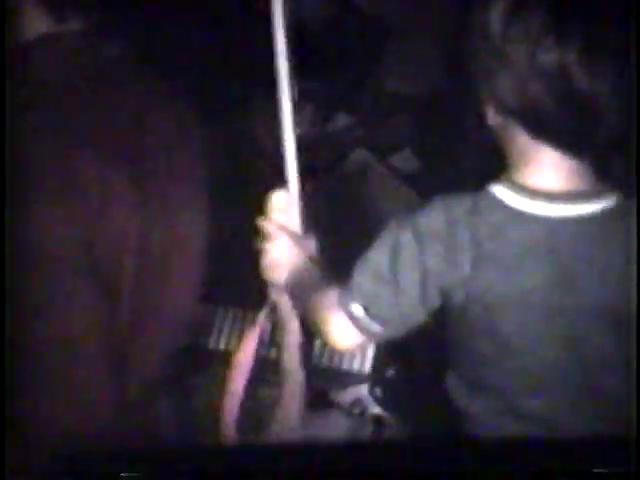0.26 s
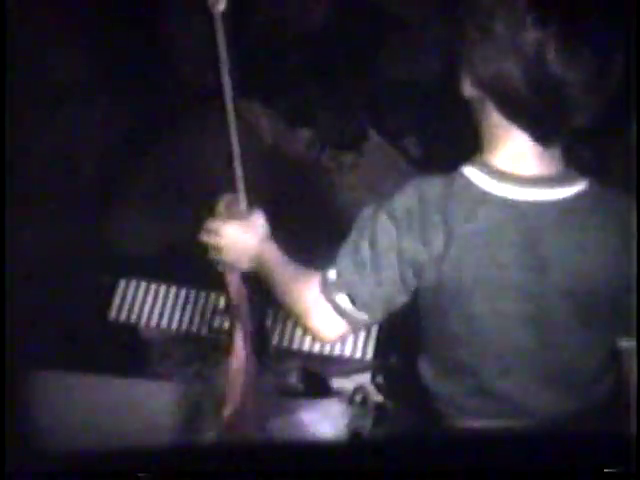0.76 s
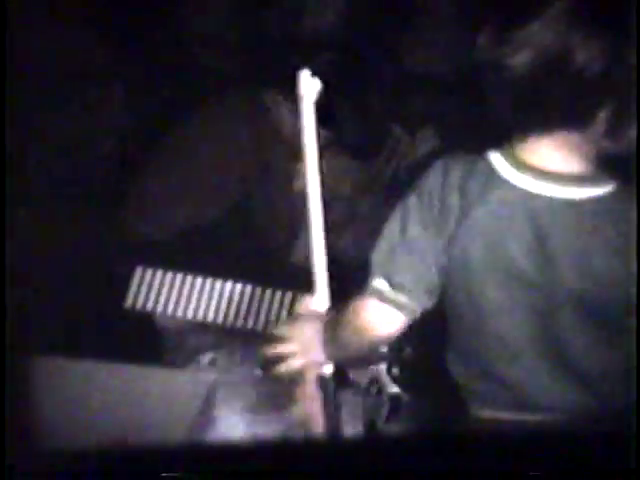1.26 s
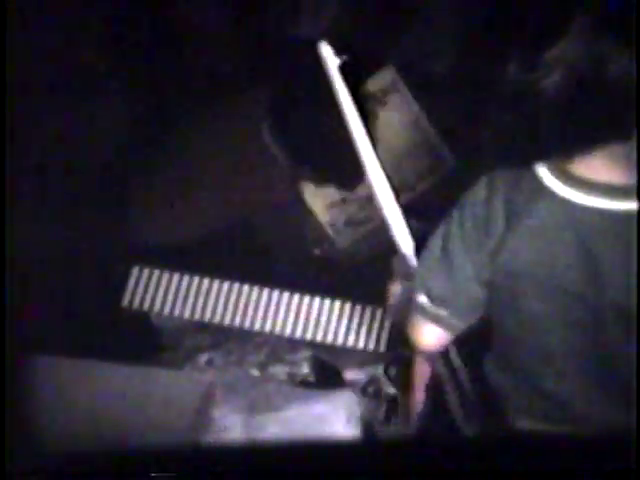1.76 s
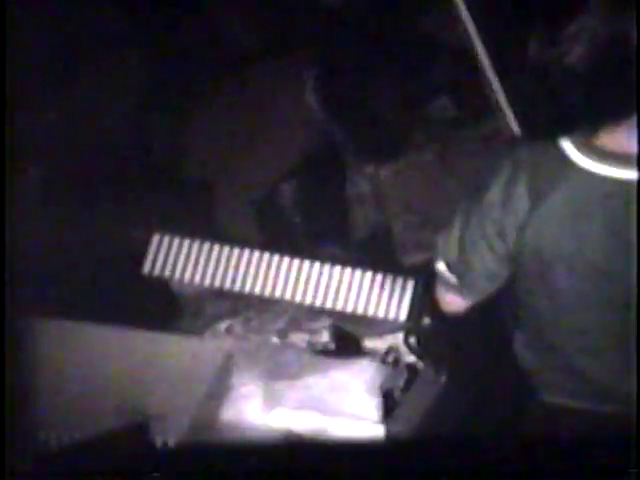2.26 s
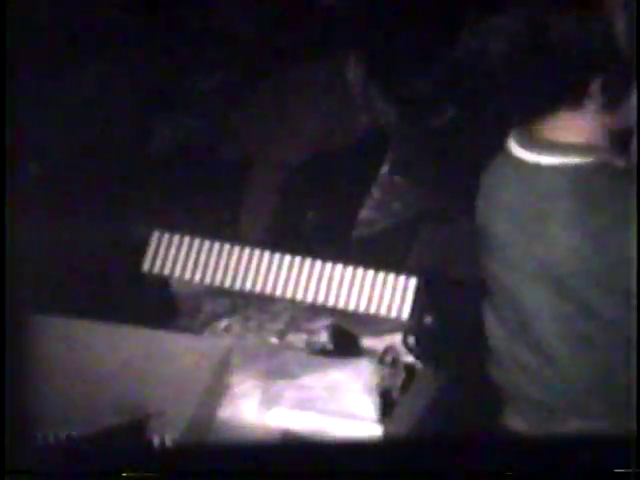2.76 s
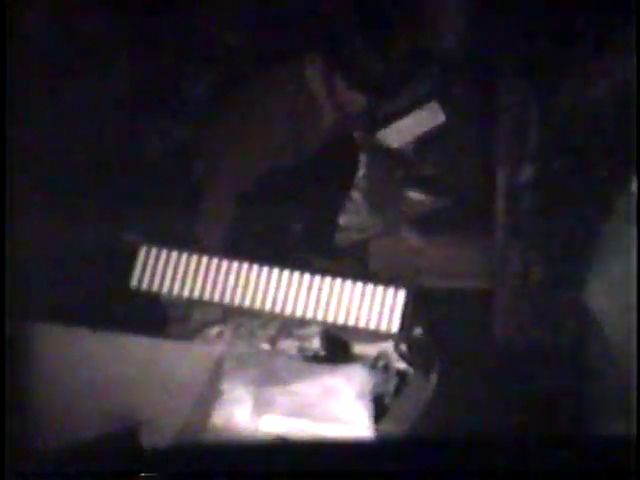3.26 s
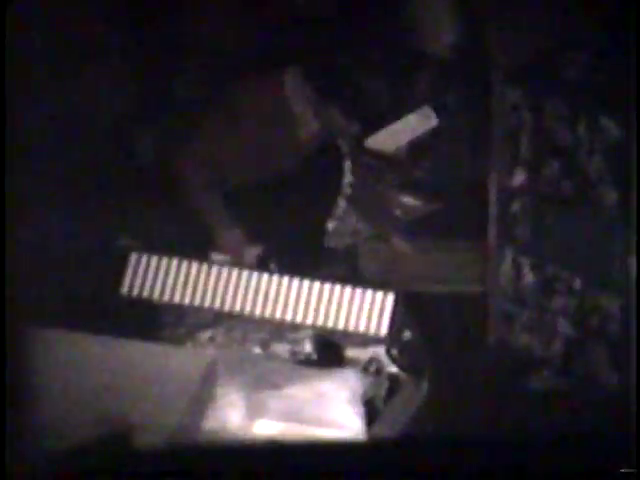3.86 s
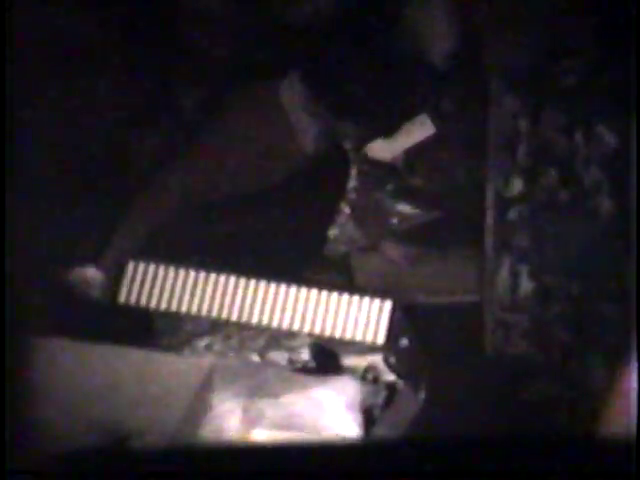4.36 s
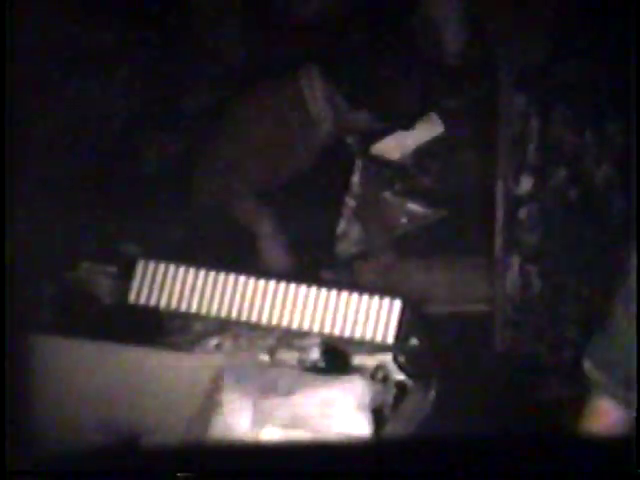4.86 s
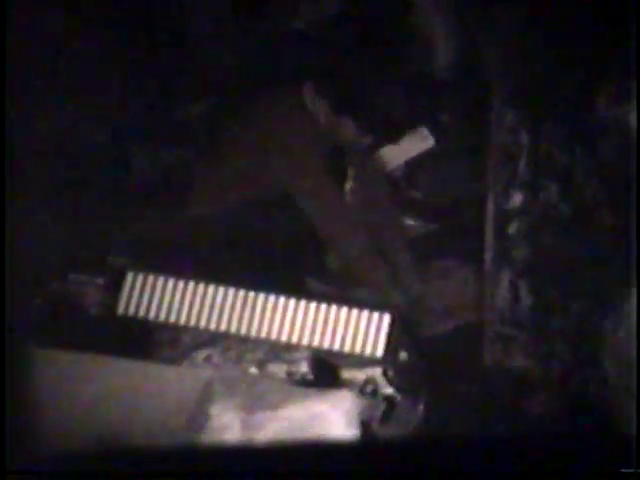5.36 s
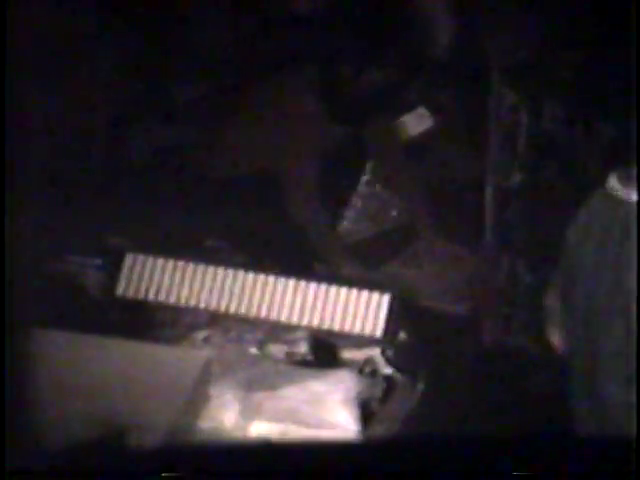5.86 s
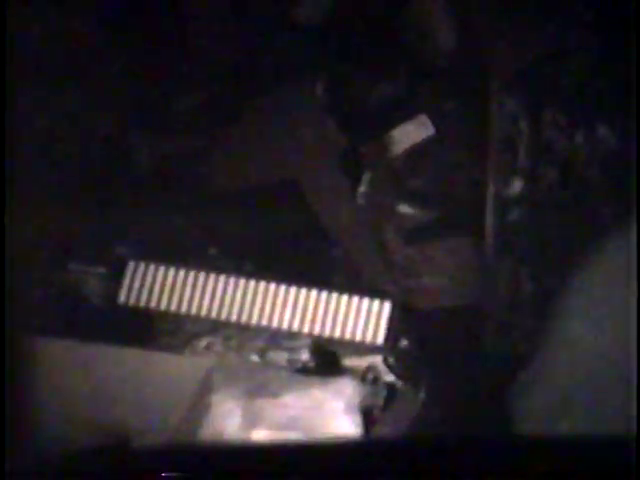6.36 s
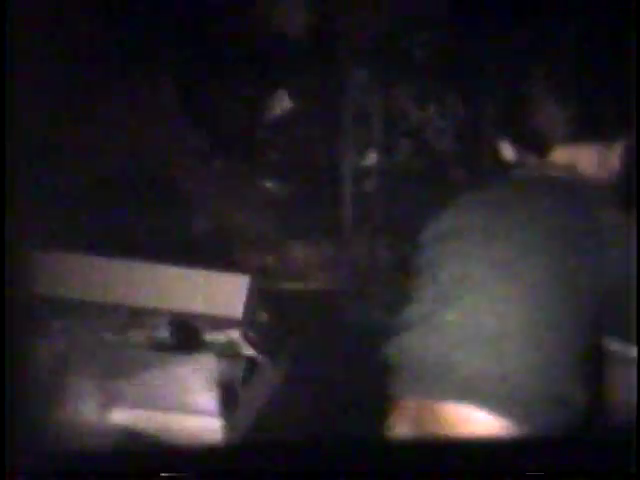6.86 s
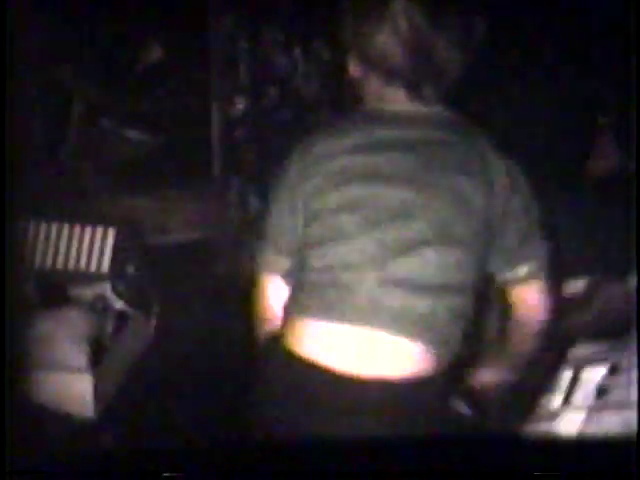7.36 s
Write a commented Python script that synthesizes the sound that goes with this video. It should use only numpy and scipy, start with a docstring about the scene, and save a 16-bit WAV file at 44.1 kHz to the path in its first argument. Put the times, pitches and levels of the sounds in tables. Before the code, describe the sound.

A film projector whirs close to the microphone from start to end at an even speed. Its motor hums, buzzes and flutters quickly, mixed with bearing hiss and a fast mechanical chatter of the claw. The shutter shaft drones along. A faint bright rub swells and lets go once each reel turn. Soft fan noise and dull low bumps sit underneath; one thin tick comes past the middle. Nobody speaks.

```python
"""In a quiet room, a small-gauge film projector runs steadily close by.
Its induction motor buzzes and throbs as the rotor slips behind the mains: steady tones, noise knocks and hiss.
The rotor bars add a beating whine, made of noise ringing in a case resonance.
The claw clatters at every frame and the shutter shaft drones; the take-up reel rubs once a turn.
Fan noise, mains hum and soft low bumps lie underneath, and one thin tick is heard."""
import sys
import numpy as np
from scipy import signal
from scipy.fft import rfft, irfft, next_fast_len
from scipy.io import wavfile

SR = 44100
rng = np.random.default_rng(int(sys.argv[2]) if len(sys.argv) > 2 else 0)


def pcm_store(signal):
    """Save signal as 16-bit PCM."""
    levels = np.round(np.clip(np.atleast_2d(signal), -1, 1) * 32767)
    wavfile.write(sys.argv[1], SR, levels.astype(np.int16).T)


N = 335601
TIME = np.arange(N) / SR  # seconds


def from_db(db):
    """Turn decibels into gain."""
    return 10 ** (np.asarray(db) / 20)


def rms_one(x):
    """Scale a sound to an rms level of 1."""
    return x / np.sqrt(np.mean(x ** 2) + 1e-20)


def drift(rate):
    """Random wandering with rms 1; a higher rate (Hz) wanders faster."""
    step = 40  # samples between the points of the wandering line
    r = np.exp(-2 * np.pi * rate * step / SR)
    noise = rng.standard_normal(N // step + 2002)
    slow = signal.lfilter([1], [1, -2 * r, r * r], noise)[2000:]  # skip the filter's start
    return np.interp(np.arange(N) / step, np.arange(len(slow)), rms_one(slow))


def wave(turns):
    """A cosine that peaks at each full turn."""
    return np.cos(2 * np.pi * turns)


def turning(part, wander):
    """Turns made by a part whose angle wanders a little (wander in turns)."""
    rate, start = part
    return rate * (TIME - start) + wander * drift(1.8)


def surface(turns, fresh):
    """Roughness that comes round with every turn, plus a share that is always new."""
    size = round(N / (turns[-1] - turns[0]))  # samples in an average turn
    one_turn = rng.standard_normal(size)
    place = (turns * size).astype(int) % size
    return one_turn[place] + fresh * rng.standard_normal(N)


def burst(turns, rate, decay, rise=0.00098):
    """An envelope that swells at each full turn and dies away (decay and rise in seconds)."""
    age = (turns % 1) / rate
    return np.exp(-age / decay) * (1 - np.exp(-age / rise))


def band(x, hz, width):
    """Ring of one resonant part, at hz with a width in Hz; rms 1."""
    edges = np.clip([hz - width / 2, hz + width / 2], 50, SR * .45)
    return rms_one(signal.sosfilt(signal.butter(2, edges, "band", fs=SR, output="sos"), x))


def lift_db(hz, modes):
    """How much a set of resonances raises or lowers each frequency, in dB."""
    return sum(lift / (1 + (2 * (hz - centre) / width) ** 2) for centre, width, lift in modes)


def colour(x, spectrum, modes=()):
    """Shape a sound by a broad spectrum and the resonances on it; rms 1."""
    size = next_fast_len(N)
    hz = np.maximum(np.fft.rfftfreq(size, 1 / SR), 1)
    points, levels = np.transpose(spectrum)
    db = np.interp(np.log(hz), np.log(points), levels) + lift_db(hz, modes)
    return rms_one(irfft(rfft(x, size) * from_db(db), size)[:N])


# Resonances of the case. Each row: frequency in Hz, width in Hz, lift in dB (negative: a dip).
CASE_MODES = [(156, 10, 2), (552, 45, 10), (642, 81, -13.5), (978, 36, -20.5), (1045, 66, 6.5),
              (1294, 15, 12), (1368, 65, -14), (1511, 29, 10), (1901.4, 29.6, 12), (3080, 53, 6.5),
              (3750, 940, 5.5), (4808, 230, 12.5), (5180, 105, 9.5), (6710, 150, 10), (7750, 130, 5.5),
              (8240, 120, 11), (9330, 120, 9)]
# Resonance of the motor on its mount. Each row: frequency in Hz, width in Hz, lift in dB.
MOUNT_MODES = [(413.7, 43.5, 10)]


def case_tone(turns, hz, db, smear=.6):
    """One motor tone as mount and case pass it on, each frequency with its own gain and delay."""
    panels, body = (505, 549), 480  # Hz
    flip = sum(hz > panel for panel in panels) / 2  # above its resonance each panel moves against the force
    dispersion = smear * (2 * (hz - body) / body) ** 2  # in turns
    gain = from_db(db + lift_db(hz, CASE_MODES + MOUNT_MODES))
    return np.sqrt(2) * gain * wave(turns - flip - dispersion)


# The magnetic pull. It holds: turns per second, moment of a full turn in seconds.
PULL = (120.009, .0062)
# Speed of the rotor. Each row: time in seconds, turns per second.
ROTOR_SPEED = [(0.0, 53.777), (1.8, 53.763), (2.6, 53.802), (3.4, 53.748), (4.4, 53.779), (5.8, 53.782),
               (6.6, 53.792), (7.6, 53.773)]
# Magnetic buzz. Each row: multiple of the pull rate, level in dB rms before mount and case.
BUZZ = [(2, -45), (3, -41), (4, -43.5), (5, -35), (6, -44.5), (7, -56.5)]
# Combs of side tones, one pull rate apart (low multiples: off-centre running, high: the rotor bars).
# Each row: multiple of the rotor rate, strongest frequency in Hz,
# level there in dB rms before wavering, mount and case, fall to either side in dB per octave.
COMBS = [(-3, 550, -61, 13), (-2, 1100, -57.5, 14.5), (-1, 520, -38.5, 19.5), (1, 466, -38, 23.5),
         (2, 530, -45.5, 18), (3, 881, -44.5, 47), (8, 430, -53, 30), (15, 1887, -63.5, 27),
         (16, 690, -51, 20), (17, 880, -44, 13.5), (18, 950, -46.5, 52), (19, 1022, -50, 28)]


def motor_tones(pull, rotor, waver_db=0.4):
    """The rotor splits the magnetic buzz into combs of side tones, which beat with each other."""
    lowest_hz, highest_hz = 250, 1950
    pull_hz = PULL[0]
    rotor_hz = np.mean(ROTOR_SPEED, axis=0)[1]
    out = sum(case_tone(k * pull, k * pull_hz, db) for k, db in BUZZ)
    for m, centre_hz, db, fall_db in COMBS:
        first = np.ceil((lowest_hz - m * rotor_hz) / pull_hz)
        last = np.ceil((highest_hz - m * rotor_hz) / pull_hz)
        comb = 0
        for k in np.arange(first, last):
            hz = k * pull_hz + m * rotor_hz
            tone_db = db - fall_db * abs(np.log2(hz / centre_hz))
            comb = comb + case_tone(k * pull + m * rotor, hz, tone_db)
        out = out + from_db(waver_db * drift(4.6)) * comb
    return out


# Tone colour of the rattle before the case. Each row: frequency in Hz, relative level in dB.
RATTLE = [(50, -53), (150, -38), (215, -22), (290, -5), (420, -6.5), (600, -1), (800, 0), (920, 0.5),
          (1000, -4.5), (1200, -9), (1450, -5), (1750, -7), (2000, -18.5), (2700, -26), (15000, -78)]


def rattle(pull, rotor, level_db=-29.5, rotor_db=0.5, decay=0.012, lead=.15):
    """Each magnetic pull knocks the rotor in its bearings, harder as its high spot passes."""
    force = from_db(rotor_db * (wave(pull - rotor - 1 / 3) + wave(rotor + 1 / 3) / 2))
    # lead: the share of a turn by which each knock comes early
    knocks = force * burst(pull + lead, PULL[0], decay) * surface(rotor, fresh=2.1)
    return from_db(level_db) * colour(knocks, RATTLE, CASE_MODES)


# Tone colour of the bearing hiss before the case. Each row: frequency in Hz, relative level in dB.
CHAFE = [(1200, -12.5), (2200, 0.5), (2700, 2), (3300, -15), (3700, -0.5), (4900, -1.5), (5700, -10.5),
         (7200, -13), (9400, -10.5), (10200, -20.5), (12500, -28.5), (15000, -44)]


def chafe(pull, rotor, level_db=-42.0, rotor_db=1.95, beat_db=2.1, slip_db=1.5, pull_db=-1.6, grain_db=2.5):
    """The bearings hiss in spurts as the rotor's high spot meets the magnetic pull."""
    pressure_db = rotor_db * wave(rotor) + pull_db * wave(pull)
    pressure_db += beat_db * wave(pull - rotor) + slip_db * wave(pull - 2 * rotor)
    friction = from_db(pressure_db + grain_db * drift(133)) * surface(rotor, fresh=1.8)
    return from_db(level_db) * colour(friction, CHAFE, CASE_MODES)


def whine(pull, rotor, level_db=-38.5, hz=1550, width=70, bead_db=4.5, slip_db=4.5):
    """A case resonance sings in beads as the rotor bars beat with the buzz, and flutters as the rotor slips."""
    bar_beat = 18 * rotor - 8 * pull
    grip_db = bead_db * wave(bar_beat) - slip_db * wave(pull - 2 * rotor)
    grip = from_db(grip_db) * (1 + wave(pull - rotor) / 2)
    return from_db(level_db) * band(grip * surface(rotor, fresh=1.0), hz, width)


# The frame-by-frame turning. It holds: turns per second, moment of a full turn in seconds.
FRAME = (17.2015, 0)
# Contacts of claw and cam in each frame. Each row: share of the turn, frequency in Hz, width in Hz,
# level in dB rms, decay in seconds (before the ring of the part).
CONTACTS = [(0.018, 2530, 453, -59.5, 0.0043), (.365, 6600, 1580, -64.5, 0.0053),
            (0.394, 6055, 420, -57.5, 0.0021), (.40, 1135, 420, -43, 0.0096),
            (0.404, 2050, 627, -48.5, 0.0076), (.85, 2800, 497, -60.5, 0.0027),
            (.86, 4070, 1210, -56, 0.019), (0.893, 2190, 440, -47, 0.0076), (.90, 914, 537, -40.5, 0.0076)]


def claw(frame, uneven_db=0.56):
    """The same contacts come round at every frame, partly alike and partly new, with wandering force."""
    out = np.zeros(N)
    for share, hz, width, db, decay in CONTACTS:
        contact = burst(frame - share, FRAME[0], decay) * surface(frame, fresh=0.21)
        force = from_db(uneven_db * drift(8))
        out += from_db(db) * band(force * contact, hz, width)
    return out


# Drone of the shutter shaft. Each row: multiple of the frame rate, level in dB rms.
SHAFT_TONES = [(26, -45.5), (28, -63), (29, -51), (32, -51), (33, -55), (45, -51), (50, -54), (74, -50)]


def shaft(frame, load_at=.55):
    """The cam loads the shutter shaft once a turn and sets the frame droning."""
    # all tones peak together at load_at, a share of the turn
    return np.sqrt(2) * sum(from_db(db) * wave(k * (frame - load_at)) for k, db in SHAFT_TONES)


# Mains hum. Each row: frequency in Hz, level in dB rms.
HUM = [(60, -49.5), (120, -69.5), (180, -66)]
# Tone colour of the fan air before the case. Each row: frequency in Hz, relative level in dB.
FAN = [(20, -1), (45, -19), (100, -14.5), (200, -14.5), (280, -2), (900, -1.5), (1800, -14.5), (2300, -18),
       (5000, -28), (10000, -47), (16000, -59)]


def background(fan_db=-36.5):
    """Smooth air from the lamp fan is shaped noise; mains hum is a few steady tones."""
    hum = np.sqrt(2) * sum(from_db(db) * wave(hz * TIME) for hz, db in HUM)
    return hum + from_db(fan_db) * colour(rng.standard_normal(N), FAN, CASE_MODES)


# Soft low bumps. Each row: start in seconds, level in dB before the overall trim and the swing back.
BUMPS = [(0.08, -34), (0.253, -41), (1.531, -34.5), (1.709, -33), (2.024, -40), (3.686, -37), (4.731, -37),
         (5.544, -40)]


def bumps(level_db=-0.5, decay=0.013, recover_hz=2.8):
    """Soft bumps in the deep bass, each a push and a slow swing back."""
    out = np.zeros(N)
    for start, db in BUMPS:
        age = np.maximum(TIME - start, 0) / decay
        out += from_db(db + level_db) * age * np.exp(1 - age)
    # the high-pass filter makes the swing back
    return signal.sosfilt(signal.butter(1, recover_hz, "high", fs=SR, output="sos"), out)


# How hard the reel rubs. Each row: time in seconds, level in dB before the rise and fall of each rub.
RUB_LEVEL = [(0, -38.5), (1.6, -40.5), (4.7, -34.5), (7.6, -40.5)]
# A stray touch of the film on the flange. It holds: middle in seconds, level in dB, half length in seconds.
STRAY_TOUCH = (5.528, -43, .028)
# Tone colour of the rub. Each row: frequency in Hz, relative level in dB.
REEL_RUB = [(100, -62), (3000, -32), (4500, -23), (4740, -4), (4820, 6.5), (4930, -6), (5300, -20),
            (7000, -35), (15000, -72)]


def reel(grain_db=5.0):
    """The flange brushes the film once a turn with a thin ringing hiss, pressing slowly, letting go quickly."""
    turn_s, first_rub_s = 1.046, .552
    rise_s, fall_s = 0.1, 0.031
    since = (TIME - first_rub_s) % turn_s
    pressure = np.exp(-since / fall_s) + np.exp((since - turn_s) / rise_s)
    rubs = from_db(np.interp(TIME, *np.transpose(RUB_LEVEL))) * pressure
    middle, db, length = STRAY_TOUCH
    stray = from_db(db) * np.exp(-((TIME - middle) / length) ** 2)
    grain = from_db(grain_db * drift(60)) * rng.standard_normal(N)
    return (rubs + stray) * colour(grain, REEL_RUB)


# One thin tick. It holds: start in seconds, level in dB before its top is softened.
TICK = (4.492, -45)


def tick(decay=.0006, top_hz=11000):
    """A tiny bright snap: noise that dies away at once, its top softened by a low-pass filter."""
    start, db = TICK
    envelope = (TIME > start) * np.exp(-abs(TIME - start) / decay)
    snap = from_db(db) * envelope * rng.standard_normal(N)
    return signal.sosfilt(signal.butter(1, top_hz, fs=SR, output="sos"), snap)


def scene():
    """All parts turn together in one case."""
    pull, frame = turning(PULL, wander=0.0012), turning(FRAME, wander=.0015)
    rotor_speed = np.interp(TIME, *np.transpose(ROTOR_SPEED))
    # adding up the speed gives turns, from a starting angle and with a little wander
    rotor = -.345 + np.cumsum(rotor_speed) / SR + .003 * drift(2.7)
    motor = motor_tones(pull, rotor) + rattle(pull, rotor) + chafe(pull, rotor) + whine(pull, rotor)
    transport = claw(frame) + shaft(frame) + reel() + tick()
    return (motor + transport + background() + bumps())[None]


def record(dry):
    """The sound fades in over 4 ms and a steep low-pass filter cuts the top."""
    cutoff_hz = 15800
    opening = np.minimum(TIME / .004, 1)
    return signal.sosfilt(signal.ellip(10, .1, 90, cutoff_hz, fs=SR, output="sos"), dry * opening)


dry = scene()
out = record(dry)
pcm_store(out)
```